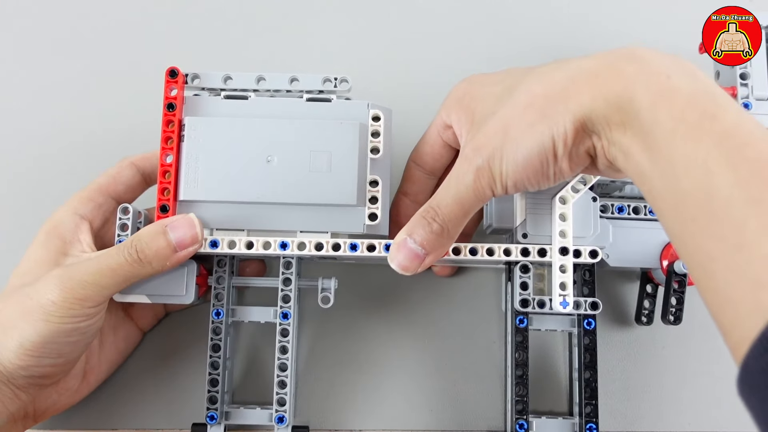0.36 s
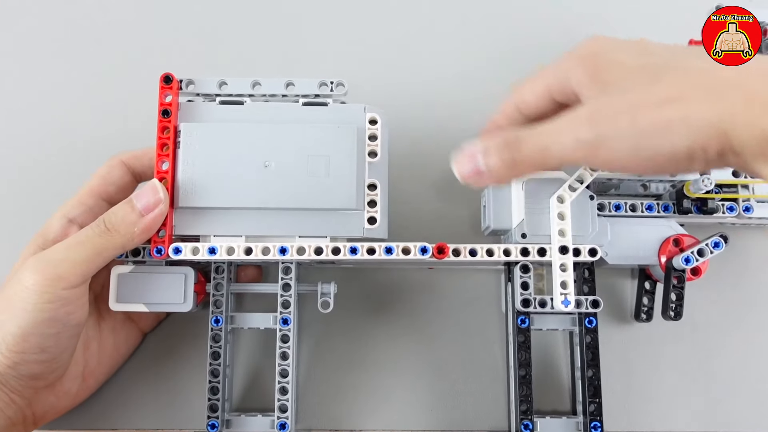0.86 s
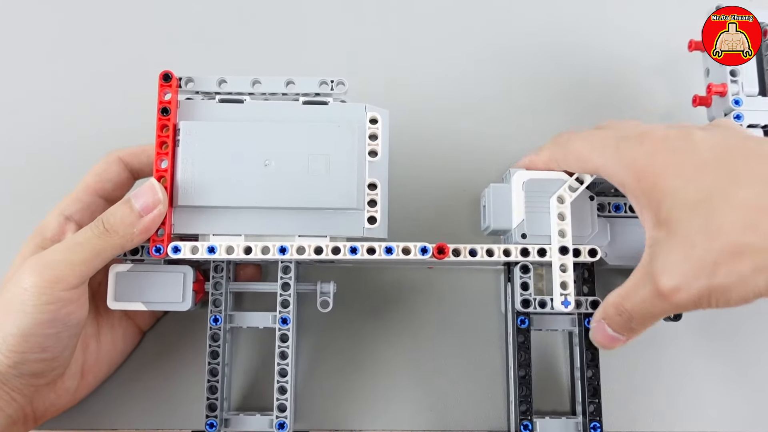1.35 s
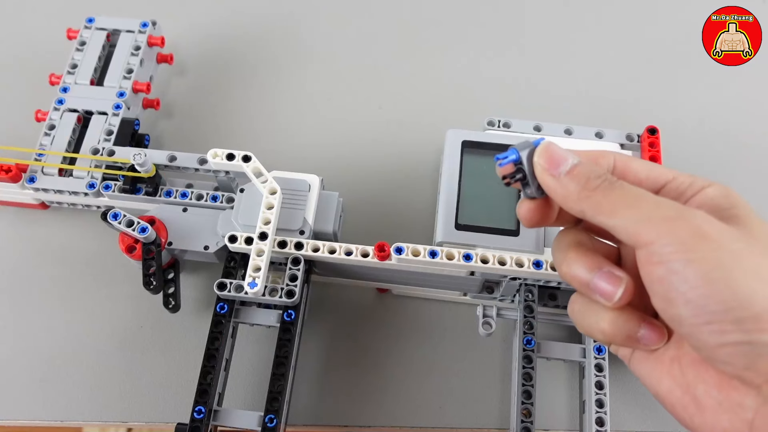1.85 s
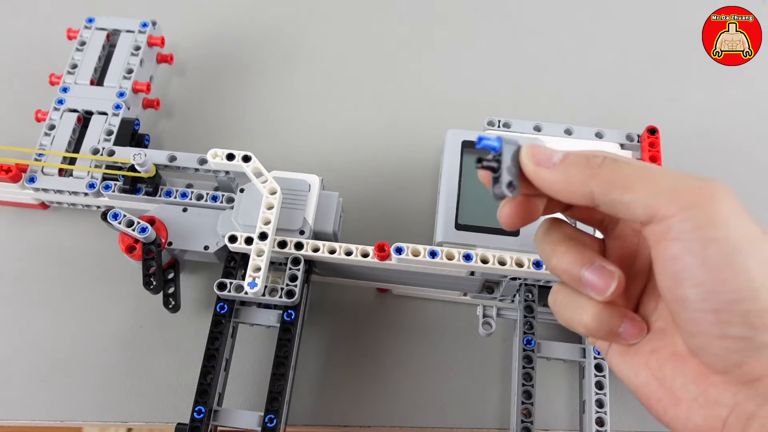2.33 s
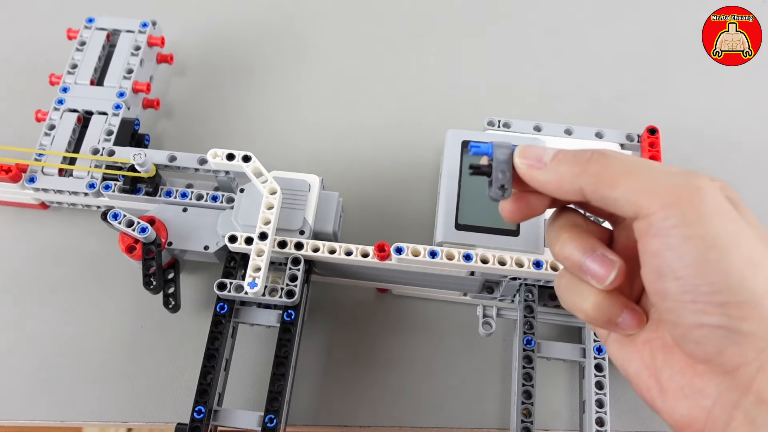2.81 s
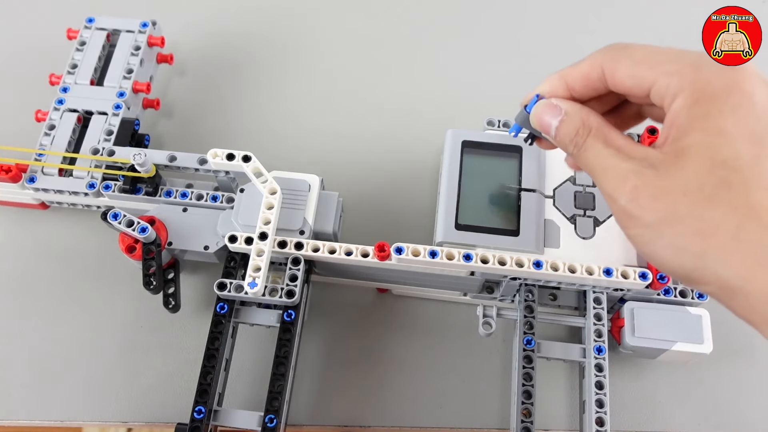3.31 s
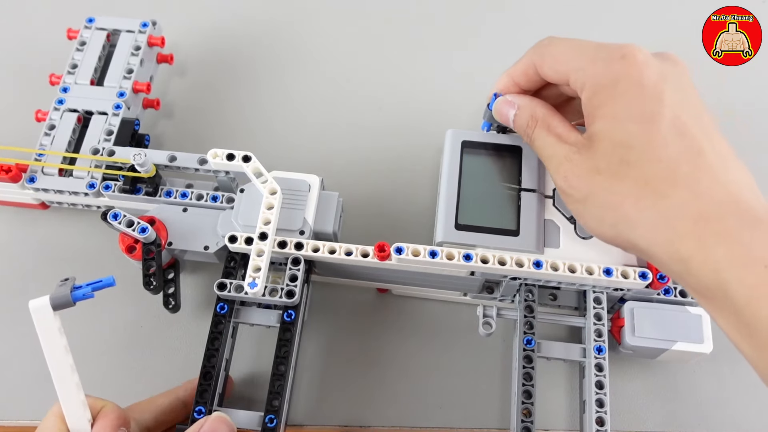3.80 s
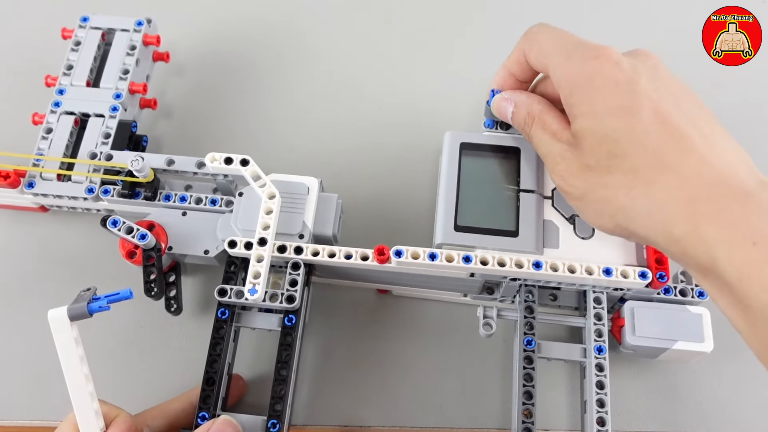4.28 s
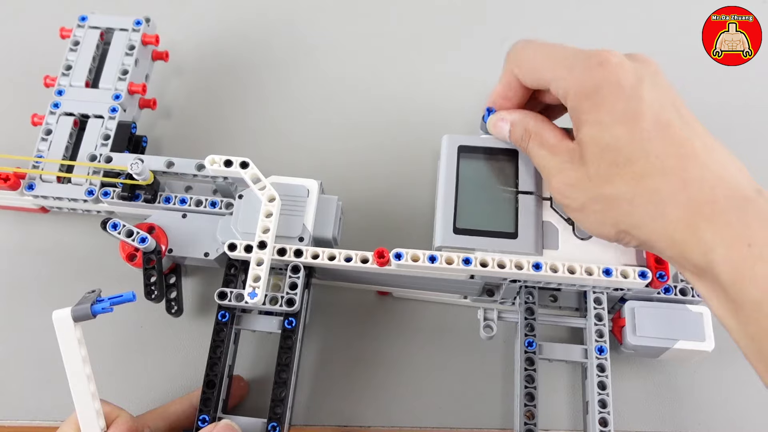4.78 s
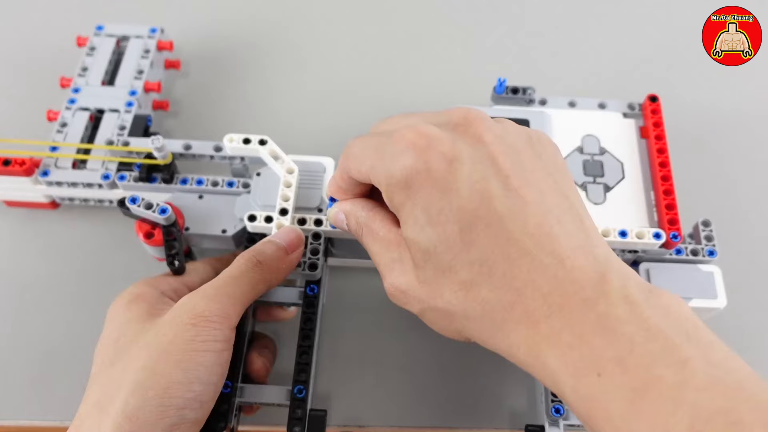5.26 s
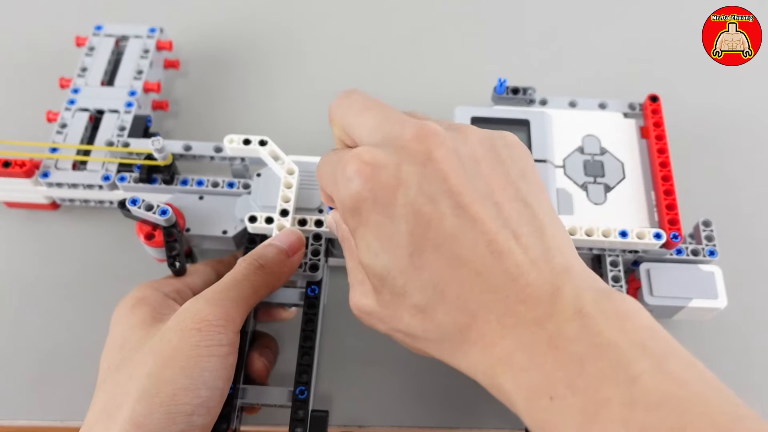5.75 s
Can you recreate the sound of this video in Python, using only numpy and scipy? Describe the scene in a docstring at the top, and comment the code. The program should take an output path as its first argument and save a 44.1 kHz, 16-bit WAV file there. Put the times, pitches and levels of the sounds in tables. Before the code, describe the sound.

A near stereo microphone in a hard-walled room, with soft steady airy hiss throughout. From 0 to 0.7 s, plastic beams tick and rattle faintly in quick irregular taps, strongest around 0.5-0.7 s, with light finger rustle. A lull follows, then another small cluster at 1.35-1.65 s, cut off by an edit at 1.74 s. Only quiet room tone remains until about 3.8 s, apart from a barely audible tick near 3.05 s. Small connector clicks then gather, with a firm, mid-pitched snap at 4.15 s, a lesser click at 4.37 s, light ticks, and a loud hard snap at 4.84 s with a short table knock and lingering echo. After another edit at 5.25 s, light clicks at 5.3-5.6 s lead to a sharp double clack at 5.65 s and the brightest, loudest snap at 5.86 s, its echo still sounding at the end.

```python
"""Hands press plastic beams and pins together on a table in a hard-walled room, in three scenes joined by edits.
Each contact is a short rattle of noise that excites the resonances of the part, one of them favoured.
Blows also thud through the modes of the table top, and decaying noise answers as the walls for most of a second.
Uneven grainy noise gives the finger rustle and the lingering echo after the snaps near 4.84 and 5.86 s;
a steady room tone lies underneath."""
import sys
import numpy as np
from scipy import signal
from scipy.fft import rfft, irfft, next_fast_len
from scipy.io import wavfile
from scipy.ndimage import uniform_filter1d, map_coordinates

SR = 44100
rng = np.random.default_rng(int(sys.argv[2]) if len(sys.argv) > 2 else 0)


def put_to_file(sound):
    """Save the sound as 16-bit audio at rate SR, in the file named by the first command-line argument."""
    columns = np.atleast_2d(sound).T  # one column per channel
    safe = np.clip(columns, -1, 1)
    whole_steps = np.round(safe * 32767)
    wavfile.write(sys.argv[1], SR, whole_steps.astype(np.int16))


def boost_factor(decibels):
    """Convert a level in decibels to a linear amplitude factor."""
    exponent = np.asarray(decibels, float) / 20
    return 10 ** exponent


N = 259308

# starts of the three scenes: time [s]
SCENES = [0, 1.737, 5.25]
# colour of the parts held in scenes one, two and three: (frequency [Hz], relative level per Hz [dB])
FRAME = [(240, -23), (400, 0), (452, 4), (552, -10), (643, -1), (1120, -4.5), (1340, 0.5), (2150, -1),
         (6190, -4.5), (15500, -16)]
CONNECTOR = [(240, -11), (400, -12.5), (673, -4), (847, -6.5), (928, -2.5), (1190, 4.5), (1540, 4.5),
             (2510, 7), (3400, 1.5), (5910, -2.5), (15500, -17.5)]
BEAM = [(240, -27), (400, -1), (466, 5.5), (511, -30), (586, -1), (1240, 5), (4090, 0.5), (5910, 4.5),
        (13100, -2.5), (15500, -11)]


def unit(x):
    """Normalisation of the mean power: x scaled to rms 1."""
    return x / np.sqrt(np.mean(x ** 2) + 1e-20)


def along(points, hz):
    """Interpolation of (frequency [Hz], value) points on a logarithmic frequency axis."""
    f, v = np.transpose(points)
    return np.interp(np.log(hz + 1), np.log(f + 1), v)


def filtered(x, response):
    """Linear filtering: the spectrum of x times a complex response of frequency."""
    m = next_fast_len(x.shape[-1] + 4096)
    spectrum = rfft(x, m) * response(np.fft.rfftfreq(m, 1 / SR))
    return irfft(spectrum, m)[..., :x.shape[-1]]


def causal(points, hz):
    """Minimum phase: folding the cepstrum gives the gain of (Hz, dB) points a causal response."""
    cepstrum = irfft(np.log(boost_factor(along(points, hz)) + 1e-6))
    half = len(cepstrum) // 2
    cepstrum[1:half] *= 2
    cepstrum[half + 1:] = 0
    return np.exp(rfft(cepstrum))


def peak(f, hz, width):
    """Damped resonator: a causal resonance of height 1 at hz."""
    return 1j * f * width / (hz * hz - f * f + 1j * f * width)


def spread(pair, alike):
    """Stereo coherence: two unrelated signals mixed into a left and right of given likeness."""
    turn = lambda hz: np.arccos(np.clip(along(alike, hz), 0, 1)) / 2
    mid, side = filtered(pair, lambda hz: np.array([np.cos(turn(hz)), np.sin(turn(hz))]))
    return np.array([mid + side, mid - side])


def walls(swell_s):
    """Diffuse reverberation: decaying noise, left energy 1, that swells as the first echoes gather."""
    # decay of the walls: (frequency [Hz], t60 [s])
    decay = [(200, 0.69), (700, 0.76), (2000, 0.64), (5000, 0.55), (13000, 0.47)]
    # left-right likeness of the echoes: (frequency [Hz], likeness [0-1])
    wall_alike = [(100, .997), (330, .993), (600, 0.86), (1650, 0.82), (5000, 0.47), (15000, 0.42)]
    hz, t, z = signal.stft(rng.standard_normal((2, SR * 3 // 4)), SR, nperseg=256)
    z = z * boost_factor(-60 * t / along(decay, hz)[:, None])
    tail = signal.istft(z, SR, nperseg=256)[1]
    t = np.arange(tail.shape[1]) / SR
    tail = spread(tail, wall_alike) * (1 - np.exp(-(t / swell_s) ** 2))
    return tail / np.linalg.norm(tail[0])


def in_room(dry, around, room_db, swell_s):
    """Superposition: the direct sound plus a fresh answer of the walls to what is sent around."""
    sound = boost_factor(room_db) * signal.fftconvolve(around[None], walls(swell_s), axes=1)
    sound[:, :len(dry)] += dry
    return sound


def scene_of(s):
    """Partition of time: the index of the scene that holds second s."""
    return int(np.searchsorted(SCENES, s)) - 1


def by_scene(values):
    """Piecewise-constant control: one value per sample, stepping at the edits."""
    return np.asarray(values)[np.searchsorted(SCENES[1:], np.arange(N) / SR)]


def add(out, s, sound):
    """Superposition in time; the edit after the first scene cuts its echoes short."""
    if s < SCENES[1]:
        sound = sound[:, :round((SCENES[1] - s) * SR)]
    out[:, round(s * SR):][:, :sound.shape[1]] += sound


def contact(colour, modes, ring_hz, crack_db, t60, room_db):
    """Source and resonator: a rattle excites ring and crack; its direct sound has peak 1, then the room."""
    t = np.arange(SR // 20) / SR
    unevenness = np.repeat(rng.standard_normal(len(t) // 35 + 1), 35)[:len(t)]
    bounces = rng.standard_normal(len(t)) * boost_factor(1.06 * unevenness)
    # a slow and a fast decay, with an onset of 0.32 ms
    decay = boost_factor(-60 * t / t60) + 0.86 * boost_factor(-60 * t / 0.0028)
    rattle = bounces * decay * (1 - np.exp(-t / 0.00032))

    def part(f):
        """Modal superposition: the colour of the part with its resonances."""
        return causal(colour, f) * (1 + sum(boost_factor(db) * peak(f, hz, width) for hz, width, db in modes))

    def body(f):
        """Modal excitation: where the part is struck favours one ring."""
        return (1 + 1.52 * peak(f, ring_hz, 0.33 * ring_hz)) / (1 + 1j * f / 5500) ** 2

    def crack(f):
        """Contact stiffness: a hard contact adds treble."""
        return (1j * f / (4000 + 1j * f)) ** 2

    impulse = 1. * (t == 0)
    low = unit(filtered(impulse, lambda f: part(f) * body(f)))
    high = unit(filtered(impulse, lambda f: part(f) * crack(f)))
    # averaged over all directions the rattle has a smooth colour
    around = low - boost_factor(crack_db) * high
    dry = signal.fftconvolve(rattle, around)[:len(t)]
    dry = dry / np.abs(dry).max()
    around = around * np.linalg.norm(dry) / np.linalg.norm(around)
    return in_room(dry, around, room_db, swell_s=0.013)


def clicks():
    """Impact sequence: all contacts, each ringing the part held in its scene."""
    # contacts: (time [s], direct peak [dB], ring of the part [Hz], crack against body [dB],
    # room against direct sound [dB])
    contacts = [(0.02, -42.5, 1280, -18, -1), (0.212, -46, 1530, -16, -6), (0.254, -34, 1400, -2.5, -2),
                (0.283, -38, 1210, -16, -1.5), (0.321, -39.5, 1370, 15, -7), (0.44, -39, 1520, -39, -9),
                (0.519, -33.5, 6400, 6, -8), (0.526, -29, 1090, -10, -5.5), (0.625, -28, 3930, -4, -6.5),
                (0.636, -36.5, 1420, -14, 6.5), (0.666, -33, 6160, 13, 1.5), (0.691, -28, 3840, -29, -4.5),
                (1.066, -47, 1350, -1, -12), (1.272, -53, 1670, -9, 7), (1.348, -26, 3300, -7, -2),
                (1.454, -30, 3570, -2, -9), (1.496, -37, 3240, 1.5, -14), (1.522, -38, 1380, -13, -1.5),
                (1.54, -42.5, 1770, -14, 5.5), (1.571, -36.5, 3500, -13, 2), (1.58, -35.5, 1510, -21, -9),
                (1.637, -32.5, 2600, -21, -6), (3.054, -59, 4030, -26, 2), (3.774, -39.5, 1300, -21, -2),
                (3.864, -34, 2560, -24, -4.5), (3.969, -39, 3030, -2.5, -2.5), (4.021, -35, 4580, -8, 0.5),
                (4.037, -28.5, 2830, -34, -5.5), (4.119, -31, 2800, -1, 1.5), (4.146, -14, 2430, -19, -7.5),
                (4.151, -23.5, 2620, -8, -2.5), (4.163, -25.5, 2550, -20, 1.5),
                (4.368, -24.5, 2880, -10.5, -3.5), (4.514, -38, 2610, -1, -5.5),
                (4.637, -39, 2250, -9, -0.5), (4.67, -40, 1240, -10, -5), (4.754, -45, 5600, -12, 9.5),
                (4.781, -25.5, 2100, -13, -9), (4.839, -9.5, 1350, -4, -3.5), (4.848, -23.5, 3320, -3, 10),
                (5.096, -35.5, 5930, 7, 0.5), (5.311, -40.5, 1530, -6, 5.5), (5.322, -38, 6000, -3, 3.5),
                (5.346, -25, 1350, -44, -4.5), (5.46, -36, 6170, 16, -4), (5.568, -40, 2760, -29, -8),
                (5.635, -15, 3190, 1.5, 2.5), (5.655, -27.5, 5800, 1, 11), (5.664, -17, 1850, -37, 0.5),
                (5.856, -8, 5940, 3, -2), (5.861, -17, 1150, -5, -20)]
    # resonances of the parts: (frequency [Hz], width [Hz], level [dB])
    frame_modes = [(1060, 41, 8.5), (1380, 53, -2.5), (1870, 380, -38), (3310, 460, -33),
                   (4100, 3300, -7.5), (6170, 990, 5), (10200, 1000, 7.5)]
    connector_modes = [(1083, 190, 8), (1380, 57, -3), (1964, 250, 0), (2470, 130, -11.5), (2830, 280, -9),
                       (4010, 220, 2), (4880, 420, -8.5)]
    beam_modes = [(1480, 120, -5.5), (2080, 160, -33), (3340, 970, -1), (5900, 1100, -12), (8400, 630, -9)]
    # slow decay of a rattle with the parts of each scene: t60 [s]
    rattle_s = [0.051, 0.043, 0.058]
    parts = [(FRAME, frame_modes), (CONNECTOR, connector_modes), (BEAM, beam_modes)]
    out = np.zeros((2, N + SR))
    for s, db, ring_hz, crack_db, room_db in contacts:
        k = scene_of(s)
        colour, modes = parts[k]
        add(out, s, boost_factor(db) * contact(colour, modes, ring_hz, crack_db, rattle_s[k], room_db))
    return out[:, :N]


def thud(k, knock_db, deep_db):
    """Plate modes: a soft push rings the table top; the room draws its modes out into rough tones."""
    # table top modes: (frequency [Hz], width [Hz], relative level in scene one, two, three [dB])
    table_modes = [(61, 220, -12.5, -10.5, -18.5), (129.4, 74, -4.5, -32, -9.5), (177, 5.4, 6, 13.5, 4),
                   (293, 43.5, -5, -22, -5), (325.3, 24.4, 5, 1.5, 4.5), (455, 85, 0, -9, -2.5),
                   (645, 49, -2.5, -12, 0), (849, 41, -6.5, 2, -1.5)]
    push = np.pad(np.hanning(24), (0, SR // 5))
    scatter_db = 1.5 * rng.standard_normal(len(table_modes))

    def ring(is_knock):
        """Modal sum with alternating signs, over the modes above or below 230 Hz, peak 1."""
        def response(f):
            total = 0
            for i, (hz, width, *levels) in enumerate(table_modes):
                if (hz > 230) == is_knock:
                    total = total + (-1) ** i * boost_factor(levels[k] + scatter_db[i]) * peak(f, hz, width)
            return total
        sound = filtered(push, response)
        return sound / np.abs(sound).max()

    dry = boost_factor(knock_db) * ring(True) + boost_factor(deep_db) * ring(False)
    return in_room(dry, dry, room_db=2.0, swell_s=0.006)


def thuds():
    """Structure-borne sound: the blows passed down into the table."""
    # blows: (time [s], peak of the direct knock [dB], peak of the direct deep thud [dB])
    blows = [(0.213, -57.5, -82), (0.317, -61, -70.5), (0.445, -53.5, -80), (0.522, -58.5, -85),
             (0.624, -57, -73), (1.347, -54.5, -72), (1.453, -42.5, -73), (1.522, -46, -69),
             (1.582, -44, -58), (1.633, -63, -56), (3.778, -57.5, -95), (3.867, -60, -75),
             (4.04, -49.5, -61), (4.147, -41, -42), (4.366, -47.5, -55.5), (4.635, -51.5, -53),
             (4.78, -41, -49), (4.842, -24.5, -69), (5.309, -47, -69), (5.346, -39.5, -61.5),
             (5.656, -36, -53.5), (5.666, -29, -50), (5.86, -31, -39)]
    out = np.zeros((2, N + SR))
    for s, knock_db, deep_db in blows:
        add(out, s, thud(scene_of(s), knock_db, deep_db))
    return out[:, :N]


def rustle():
    """Amplitude-modulated noise: uneven grains in the colour of the parts, blurred by the room."""
    # level of the grainy noise, which is finger rustle and the lingering echo after the snaps
    # near 4.84 and 5.86 s: (time [s], level [dB])
    grain_levels = [(0, -56.5), (.2, -85), (.6, -54), (.85, -82), (1.0, -64), (1.33, -73.5), (1.359, -51.5),
                    (1.731, -61.5), (1.74, -113), (3.402, -78), (3.95, -64), (4.3, -59.5), (4.702, -66.5),
                    (4.82, -43.5), (5.05, -50), (5.25, -69), (5.328, -64), (5.62, -73), (5.82, -46),
                    (5.88, -55)]
    lumps = map_coordinates(rng.standard_normal(N // 400 + 4), [np.arange(N) / 400])
    grains = rng.standard_normal(N) * boost_factor(3.5 * lumps)
    colours = [unit(filtered(grains, lambda hz: causal(part, hz))) for part in (FRAME, CONNECTOR, BEAM)]
    near = np.choose(by_scene([0, 1, 2]), colours)
    echoes = signal.fftconvolve(near[None], walls(swell_s=0.03), axes=1)[:, :N]
    blurred = near + boost_factor(2.5) * echoes
    return unit(blurred) * boost_factor(np.interp(np.arange(N) / SR, *np.transpose(grain_levels)))


def air():
    """Stationary coloured noise: a steady room tone with faint patches in time and frequency."""
    # colour of the room tone: (frequency [Hz], relative level per Hz [dB])
    air_colour = [(35, -79), (60, -49), (118, -22), (210, -17), (330, -13), (500, -14), (800, -9),
                  (1250, -2), (1650, -1.5), (2050, -5), (2500, -13), (3500, -17), (6000, -21),
                  (11000, -22.5), (16000, -21)]
    # room tone in each scene: level [dB]
    air_levels = [-61.5, -64.5, -61]
    # left-right likeness of the room tone: (frequency [Hz], likeness [0-1])
    air_alike = [(100, 1), (500, 0.36), (1600, 0.033), (5000, 0.14)]
    z = signal.stft(rng.standard_normal((2, N)), nperseg=512)[2]
    patches = uniform_filter1d(rng.standard_normal(z.shape[1:]), 6, axis=0)
    patches = uniform_filter1d(patches, 14, axis=1)
    pair = signal.istft(z * boost_factor(1.2 * unit(patches)), nperseg=512)[1][:, :N]
    pair = filtered(pair, lambda hz: boost_factor(along(air_colour, hz)))
    return unit(spread(pair, air_alike)) * boost_factor(by_scene(air_levels))


def scene():
    """Level panning: the work lies a little to the right, the air all round."""
    work = clicks() + thuds() + rustle()
    return work * boost_factor([[-.3], [.3]]) + air()


def band_limit(x):
    """A steep low-pass at the top of the band."""
    return signal.sosfilt(signal.butter(12, 16470, fs=SR, output="sos"), x)


def record(dry):
    """Band limiting: the low end rolls off below 90 Hz and nothing is kept from 15.9 kHz up."""
    mix = filtered(dry, lambda hz: (1j * hz / (90 + 1j * hz)) ** 2 * (hz < 15900))
    return band_limit(mix)


dry = scene()
out = record(dry)
put_to_file(out)
```